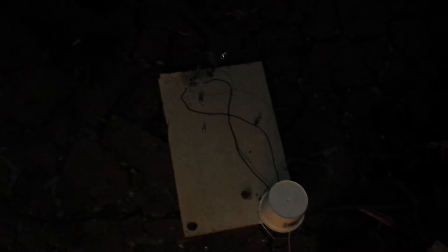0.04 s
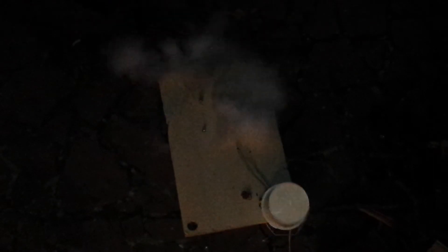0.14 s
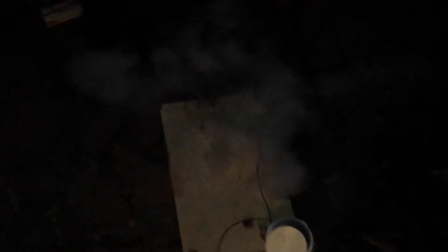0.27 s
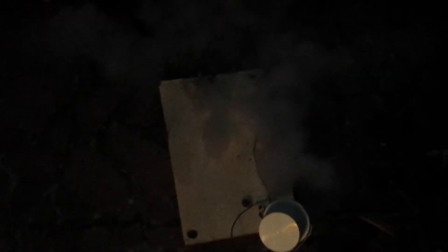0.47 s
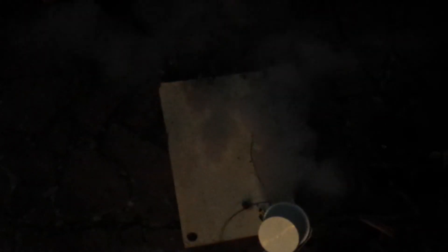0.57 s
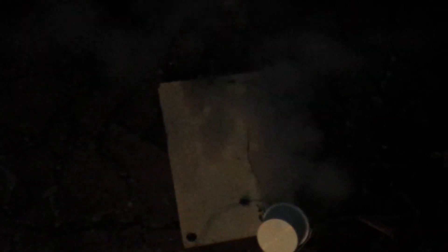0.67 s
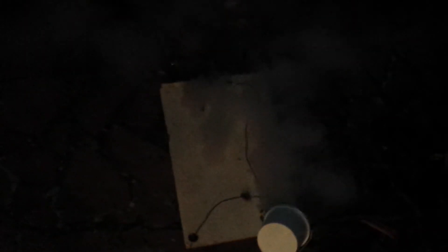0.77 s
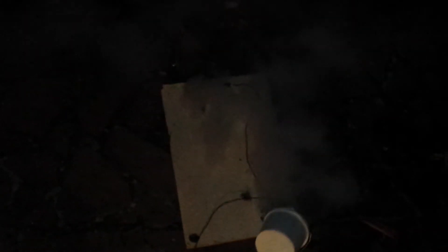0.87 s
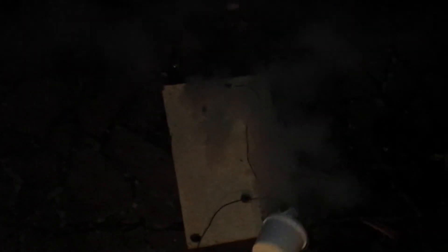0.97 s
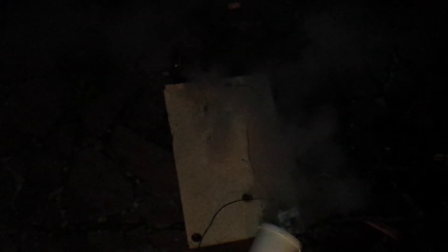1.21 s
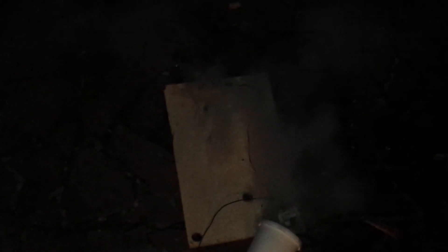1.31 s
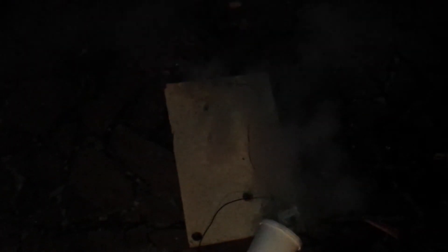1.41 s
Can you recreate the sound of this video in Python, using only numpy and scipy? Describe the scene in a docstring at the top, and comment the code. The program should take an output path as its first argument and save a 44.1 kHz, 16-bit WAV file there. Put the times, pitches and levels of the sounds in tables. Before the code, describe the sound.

A capacitor bursts under a bucket with one sharp, loud bang that overloads the microphone and echoes off the walls. The bucket then rocks with faint ticks, rolls and falls over with a knock against a quiet background.

```python
"""Capacitor bursting under a bucket

A capacitor bursts under an upturned bucket on a board. The bang rings the bucket, comes back from the
walls in separate echoes and dies away. The bucket rocks with small ticks, rolls, falls over with a knock
and settles with soft thuds, over a quiet background. The bang clips the two-port camera microphone."""
import sys
import numpy as np
from scipy import signal
from scipy.fft import rfft, irfft
from scipy.io import wavfile

SR = 44100
rng = np.random.default_rng(int(sys.argv[2]) if len(sys.argv) > 2 else 0)


def master_out(mix):
    """Clip the mix to full scale and print it as 16-bit PCM to the path in sys.argv[1]."""
    frames = np.transpose(np.atleast_2d(mix))
    ceiling = np.clip(frames, -1, 1)
    pcm = np.round(ceiling * 32767).astype(np.int16)
    wavfile.write(sys.argv[1], SR, pcm)


N = 63945
T = np.arange(N) / SR
BANG_S, FALL_S = .2018, 1.155

# Colour of the blast: frequency_hz, density_db
BLAST_COLOUR = [(18, -50.5), (30, -14.5), (171, -14.5), (275, -1.5), (480, -21.5), (662, 0.5), (978, 3),
                (1300, -6.5), (1690, -1.5), (1870, -9), (2370, -3), (2650, -15.5), (3200, -8.5),
                (3700, -19.5), (7830, -21), (15000, -40)]
# Echoes off the walls: start_s, level_db, t60_s, left_minus_right_db
WALL_ECHOES = [(0.2215, -7, 0.013, 12), (.244, -20, 0.054, 14), (0.258, -11.5, 0.068, 4.5),
               (0.2905, -10.5, 0.1, 3), (0.320, -20.5, 0.25, 2), (.397, -23, .12, 1.5),
               (.406, -35.5, 0.082, 1), (.428, -37, 0.36, 5), (0.505, -41.5, 0.24, 1),
               (.565, -53.5, 0.99, -0.5), (0.580, -38.5, 0.033, -5.5)]
# Colour of the echoes: frequency_hz, density_db
ECHO_COLOUR = [(35, -41), (60, -19), (156, -9), (395, -25), (803, -4), (959, -4), (1370, -16), (2280, -11),
               (2720, -25), (4630, -29.5), (8420, -34.5), (12000, -62.5), (15600, -86.5)]
# Colour of the reverberation: frequency_hz, density_db
REVERB_COLOUR = [(18, -63), (30, -27.5), (228, -16.5), (384, -28.5), (524, -16), (716, -7.5), (794, -2.5),
                 (1110, -12.5), (1690, -14), (3680, -24.5), (7240, -24), (11900, -37.5), (15000, -71)]
# Decay of the reverberation: frequency_hz, t60_s
REVERB_T60 = [(60, 0.41), (150, 0.66), (400, 0.95), (800, 0.26), (2000, 0.54), (4000, 0.48), (8000, 0.39),
              (12000, 0.072)]
# Stereo width of the diffuse sound: frequency_hz, side_minus_mid_db
STEREO_WIDTH = [(60, -12.5), (110, -20.5), (200, -15), (380, -9.5), (690, -11.5), (1280, -1.5),
                (2360, -2.5), (4350, 1), (8020, 0), (14800, -4)]
# Blows of the bucket on the ground: start_s, level_db, contact_ms
FALL_BLOWS = [(1.1545, -34, .15), (1.1574, -16, .35), (1.1593, -14, .25), (1.1648, -25, .5),
              (1.167, -20, .25), (1.176, -32, .8)]
# Modes of the bucket: pitch_hz, level_db, t60_s
BUCKET_MODES = [(256, -45, 0.041), (332, 1, 0.034), (445.4, -15.5, 0.15), (520, -18.5, 0.08),
                (680, 2.5, 0.0072), (990, -12, 0.0049), (1264, 0, 0.011), (1884, -1, 0.015),
                (1998, -4, 0.019)]
# Ticks of the rocking bucket: start_s, level_db, pitch_hz, left_minus_right_db, t60_s, rattle_share
ROCKING_TICKS = [(0.4765, -27, 1940, 0, 0.021, 0.58), (0.492, -40, 1900, 6, 0.0078, 0.5),
                 (0.512, -38.5, 1800, -8, 0.01, 0.9), (0.7318, -26, 2133, -0.5, 0.011, 0.02),
                 (0.75, -29, 1967, 2, 0.015, 0.17), (0.7668, -37, 1967, -1, 0.016, 0.1),
                 (.7804, -40, 2150, 3, 0.023, 0.5), (0.7939, -48, 2320, 3, 0.017, 0.1),
                 (0.827, -34.5, 2073, 0, 0.023, 0), (0.8405, -42.5, 1900, 2, 0.027, 0.1),
                 (0.9619, -42.5, 1930, 0, 0.036, 0.5), (0.9845, -45.5, 2159, 2, 0.032, 0.54),
                 (1.036, -50.5, 2480, 8.5, 0.018, 0.1), (1.0844, -47, 1763, -14, 0.005, 0.7),
                 (1.108, -44, 2090, -3, 0.0078, 0.54), (1.1291, -41.5, 1780, -4, 0.0055, 0.6),
                 (1.2237, -40, 1710, -2, 0.008, 0.3), (1.238, -41, 1770, -3, 0.044, 0.86),
                 (1.2915, -41.5, 1780, -11, 0.0054, 0.8), (1.3137, -35, 1850, 2, 0.009, 0.63),
                 (1.3632, -45, 2010, 0, 0.012, 0.1), (1.3776, -44.5, 1390, -7, 0.042, 0.67),
                 (1.445, -49, 1870, -4, 0.015, 0.64)]
# Hollow thuds: start_s, level_db, pitch_hz, width_hz, rise_s, t60_s
SETTLING_THUDS = [(1.4, -43, 382, 79, 0.024, 0.19), (1.257, -43, 348, 270, 0.0047, 0.11),
                  (1.374, -44.5, 455, 63, 0.012, 0.17), (1.373, -50, 310, 103, 0.0065, 0.14),
                  (2, -54, 393, 86, 0.018, 0.27), (1.425, -51.5, 220, 210, 0.0046, 0.16),
                  (1.423, -49.5, 105, 67, 0.014, 0.15)]
# Course of the roll: time_s, level_db
ROLL_LEVEL = [(.93, -86), (1.0, -59), (1.08, -53.5), (1.15, -49.5), (1.21, -50), (1.255, -49),
              (1.33, -54.5), (1.45, -61.5)]
# Resonances of the rolling bucket: pitch_hz, width_hz, level_db
ROLL_RESONANCES = [(430, 100, -4.5), (1110, 67, 1.5), (1660, 310, 2), (1920, 210, -4), (2220, 110, -11)]
# Crackles of debris: start_s, level_db
DEBRIS_CRACKLES = [(.291, -53), (0.36, -34), (0.48, -46.5), (.85, -64), (0.915, -62), (1.301, -57)]
# Course of the faint hiss: time_s, level_db
HISS_LEVEL = [(.4, -111), (.47, -51.5), (.55, -73), (.63, -69.5), (.68, -63), (.75, -65), (.79, -86),
              (1.0, -88), (1.15, -64.5), (1.3, -69), (1.45, -75)]
# Colour of the background: frequency_hz, density_db
BACKGROUND_COLOUR = [(18, -41.5), (30, -18), (147, -10.5), (234, -16), (281, -12.5), (1200, -17),
                     (2630, -32.5), (3880, -34), (13500, -40), (15000, -40.5)]


def undb(db):
    """Decibels to gain."""
    return 10 ** (np.asarray(db) / 20)


def on_log(table, hz):
    """Read a table of frequency_hz, value on a log frequency axis."""
    knots_hz, values = np.array(table).T
    return np.interp(np.log(hz), np.log(knots_hz), values)


def unit(x):
    """Scale to rms 1."""
    return x / np.sqrt(np.mean(x ** 2))


def decay(start_s, t60_s, rise_s=1e-9):
    """Silence until the start, a rise, then an exponential fall."""
    age = np.maximum(T - start_s, 0)
    return (1 - np.exp(-age / rise_s)) * 1000. ** (-age / t60_s)


def pan(left_minus_right_db):
    """Left and right gains."""
    return undb(np.array([[.5], [-.5]]) * left_minus_right_db)


def band(low_hz, high_hz):
    """Left and right noise in one band, half alike."""
    white = rng.standard_normal((3, N))
    bandpass = signal.butter(2, [low_hz, high_hz], "band", fs=SR, output="sos")
    return unit(signal.sosfilt(bandpass, white[:2] + white[2]))


def diffuse_noise(colour):
    """Left and right noise of the given colour, alike in the bass."""
    hz = np.maximum(np.arange(N // 2 + 1) * SR / N, 1)
    mid, side = rfft(rng.standard_normal((2, N))) * undb(on_log(colour, hz))
    side = side * undb(on_log(STEREO_WIDTH, hz))
    return unit(irfft(np.array([mid + side, mid - side]), N))


def in_room(direct, room_db, t60_s):
    """Direct sound plus a short room tail that differs left and right."""
    tail = rng.standard_normal((2, SR // 4)) * 1000. ** (-T[:SR // 4] / t60_s)
    tail = tail / np.sqrt(np.sum(tail ** 2, axis=1, keepdims=True))
    return direct + undb(room_db) * signal.fftconvolve(direct, tail, axes=1)[:, :N]


def capacitor_burst():
    """The burst reaches the microphone as an N-shaped shock and a short blast of noise."""
    shock_s = .00078
    progress = (T - BANG_S) / shock_s
    shock = undb(2) * (1 - 2 * progress) * (progress >= 0) * (progress < 1)
    blast = undb(13) * decay(BANG_S, t60_s=.055) * diffuse_noise(BLAST_COLOUR)
    return shock + blast


def wall_echoes():
    """The walls return the bang, each echo carrying the ring of the air in the bucket."""
    out, cavity_hz = 0, 780
    noise = diffuse_noise(ECHO_COLOUR)
    for start, db, t60, pan_db in WALL_ECHOES:
        ring = undb(3.5) * decay(start, t60_s=.14) * np.sin(2 * np.pi * cavity_hz * (T - start))
        out = out + undb(db) * pan(pan_db) * decay(start, t60, rise_s=.002) * (noise + ring)
    return out


def reverberation():
    """The bang dies away in a late rumble, a far tail and octave bands that fade at their own pace."""
    rumble = undb(-19.5) * band(64.5, 167.7)[0] * decay(BANG_S, t60_s=.67, rise_s=.12)
    far_tail = undb(-43) * band(500, 2234) * decay(BANG_S, t60_s=.62)
    spectrum = rfft(diffuse_noise(REVERB_COLOUR))
    hz = np.maximum(np.arange(N // 2 + 1) * SR / N, 1)
    tail = 0
    for centre_hz in 2. ** np.arange(5, 15):
        octave = np.cos(np.pi / 2 * np.clip(np.log2(hz / centre_hz), -1, 1)) ** 2
        tail = tail + irfft(spectrum * octave, N) * decay(BANG_S, on_log(REVERB_T60, centre_hz))
    return rumble + far_tail + undb(-9.5) * tail


def bucket_fall():
    """Half-sine blows on the ground ring the bucket with a crack; a longer contact rings duller."""
    push = crack_level = 0
    for start, db, contact_ms in FALL_BLOWS:
        progress = np.clip((T - start) * 1000 / contact_ms, 0, 1)
        push += undb(db) * np.sin(np.pi * progress) / (contact_ms * SR / 1000)
        crack_level += undb(db - 47.5) * decay(start, t60_s=.045)
        crack_level += undb(2 * db - 12) * decay(start, t60_s=.016)  # hard blows snap far more
    modes = sum(undb(db) * decay(0, t60) * np.sin(2 * np.pi * hz * T) for hz, db, t60 in BUCKET_MODES)
    bandpass = signal.butter(4, [260, 2700], "band", fs=SR, output="sos")
    ring = signal.sosfilt(bandpass, signal.fftconvolve(push, modes)[:N])
    crack = band(4360, 7300) * crack_level
    return in_room((ring + crack) * pan(-.5), room_db=-5, t60_s=.13)


def bucket_rocking():
    """The bucket rocks in short pings, part tone and part rattle, each with a trace of crack."""
    out = 0
    crack = undb(-29) * band(4700, 7040)
    for start, db, hz, pan_db, t60, rattle_share in ROCKING_TICKS:
        rattle_share = np.clip(rattle_share, .3, 1)
        tone = (1 - rattle_share) * np.sin(2 * np.pi * hz * (T - start))
        rattle = rattle_share * band(hz / 1.133, hz * 1.086)
        ping = decay(start, 2 * t60, rise_s=.0011) ** 2 * (tone + rattle + crack)
        out = out + undb(db) * pan(pan_db) * ping / np.abs(ping).max(axis=1, keepdims=True)
    return in_room(out, room_db=-4.5, t60_s=.12)


def bucket_settling():
    """The bucket's hollow low resonance swells in soft thuds, and the ground hums after the fall."""
    ground_hum = undb(-50) * decay(1.18, t60_s=.6, rise_s=.03) * np.sin(2 * np.pi * 110 * T)
    thuds = 0
    for start, db, hz, width, rise, t60 in SETTLING_THUDS:
        hollow = np.sin(2 * np.pi * hz * (T - start)) + band(hz - width / 2, hz + width / 2)
        thuds += undb(db) * decay(start, t60, rise) * hollow
    return ground_hum + thuds


def bucket_roll():
    """Gritty contact rings the bucket's resonances; the two lowest are damped once it lies on its side."""
    grain_samples, roughness_db = 200, 2
    white = rng.standard_normal((2, N))
    grains = np.repeat(rng.standard_normal(N // grain_samples + 1), grain_samples)[:N]
    grit = white * undb(roughness_db * grains)
    rings = []
    for hz, width, db in ROLL_RESONANCES:
        ring = signal.lfilter(*signal.iirpeak(hz, hz / width, SR), grit)
        ring = signal.lfilter(*signal.iirpeak(hz, hz / (2 * width), SR), ring)  # steeper skirts
        rings.append(undb(db) * ring / np.sqrt(width))
    damping = np.where(T < FALL_S, 1, undb(-12))
    body = sum(rings[:2]) * damping + sum(rings[2:])
    return unit(body) * undb(np.interp(T, *np.array(ROLL_LEVEL).T)) * pan(-.5)


def debris():
    """Debris gives a few dry, high crackles."""
    return band(5000, 9500) * sum(undb(db) * decay(start, t60_s=.02) for start, db in DEBRIS_CRACKLES)


def hiss():
    """A faint hiss comes and goes after the bang."""
    return band(2800, 8000) * undb(np.interp(T, *np.array(HISS_LEVEL).T))


def background():
    """The quiet, steady noise of the place."""
    return undb(-60.5) * diffuse_noise(BACKGROUND_COLOUR)


def scene():
    """Everything that reaches the microphone, left and right."""
    aftermath = hiss() + debris()
    bang = capacitor_burst() + wall_echoes() + reverberation()
    bucket = bucket_rocking() + bucket_fall() + bucket_settling() + bucket_roll()
    return bang + bucket + aftermath + background()


def record(dry):
    """The camera microphone drops the deep bass, its input clips hard, then the top is cut."""
    low_cut = signal.butter(2, 44.6, "high", fs=SR, output="sos")
    high_cut = signal.ellip(12, .2, 90, 15385, fs=SR, output="sos")
    clipped = np.clip(signal.sosfilt(low_cut, dry), -.9, .9)
    return signal.sosfilt(high_cut, clipped)


dry = scene()
out = record(dry)
master_out(out)
```